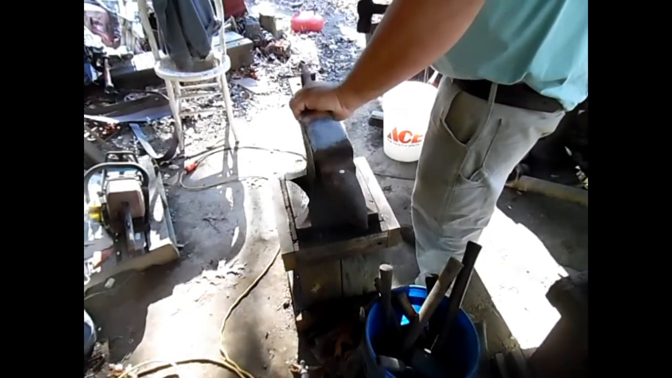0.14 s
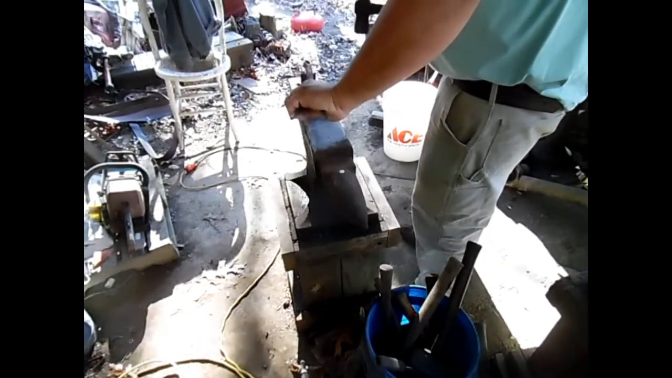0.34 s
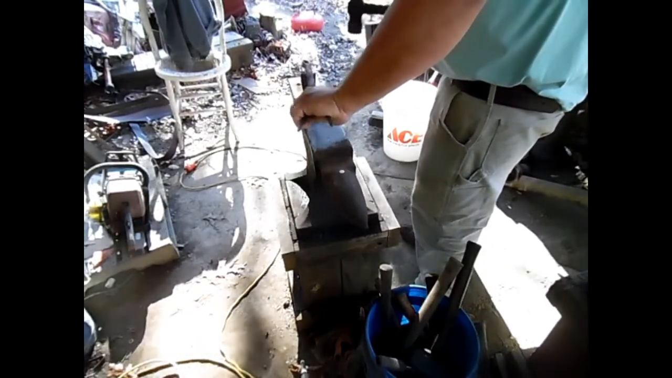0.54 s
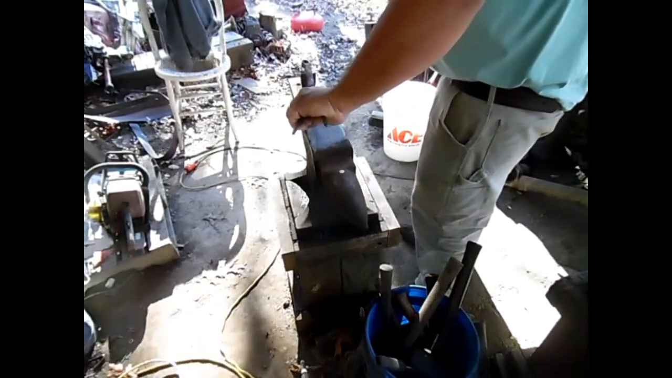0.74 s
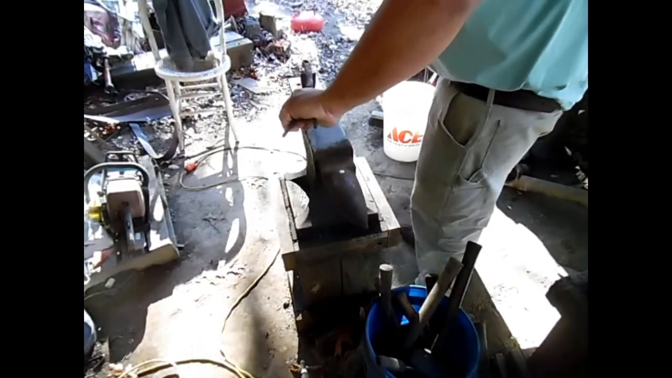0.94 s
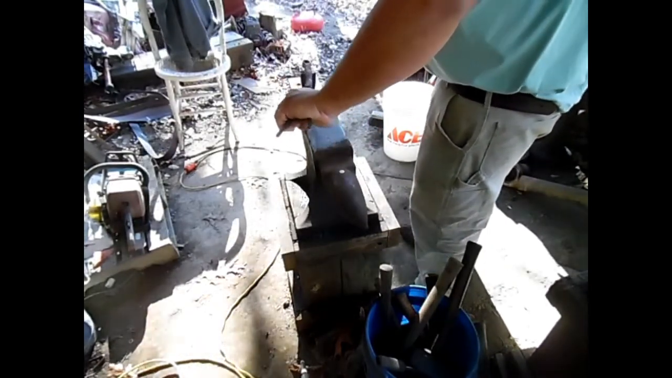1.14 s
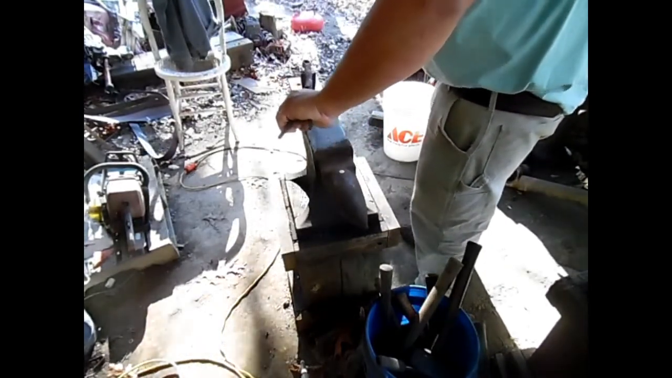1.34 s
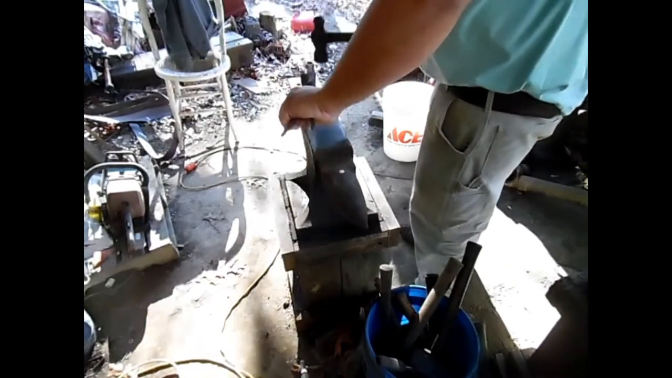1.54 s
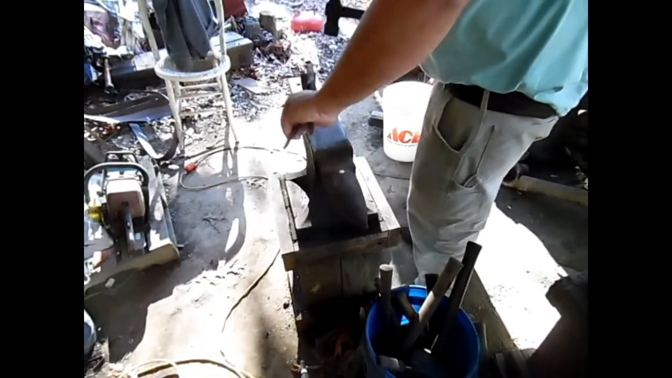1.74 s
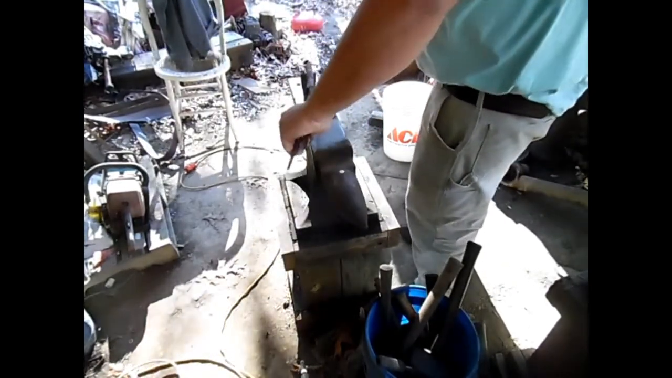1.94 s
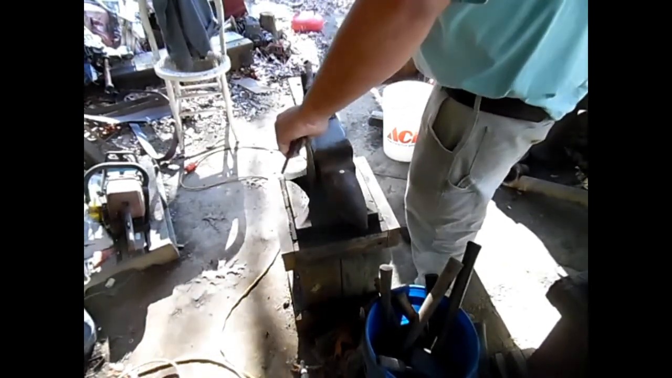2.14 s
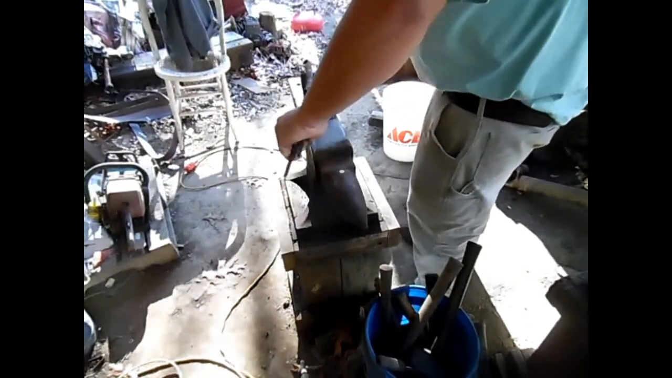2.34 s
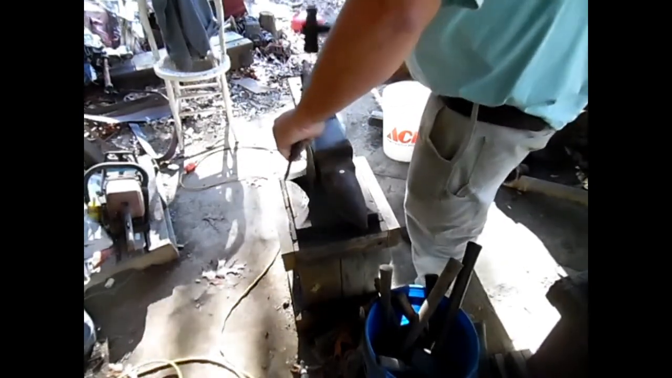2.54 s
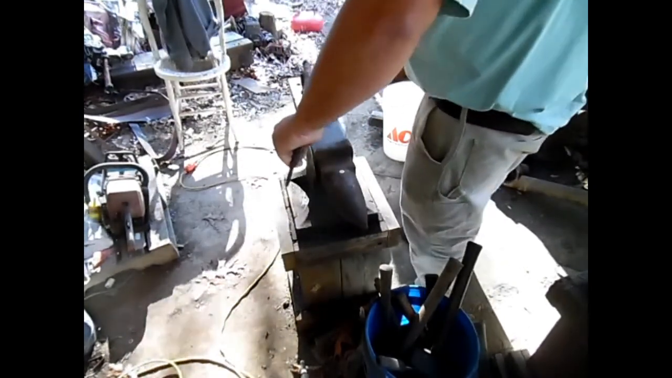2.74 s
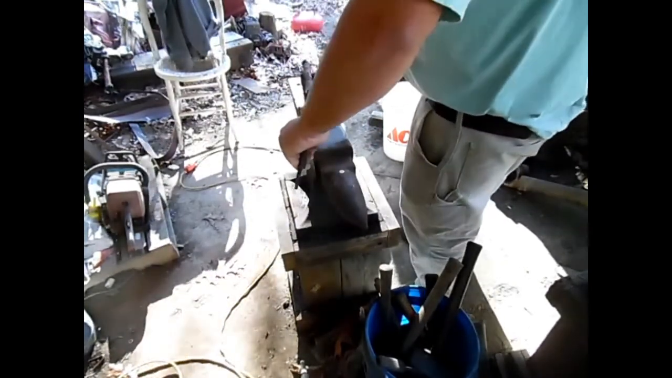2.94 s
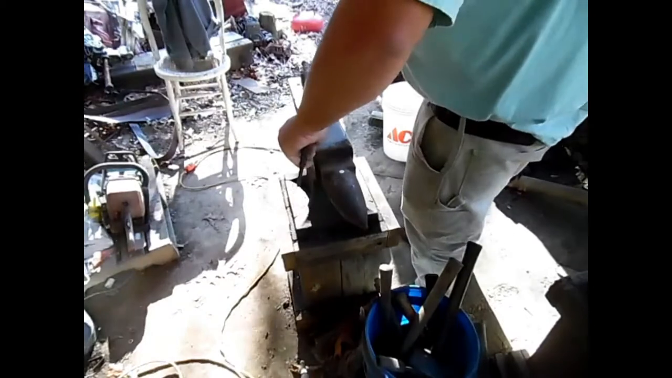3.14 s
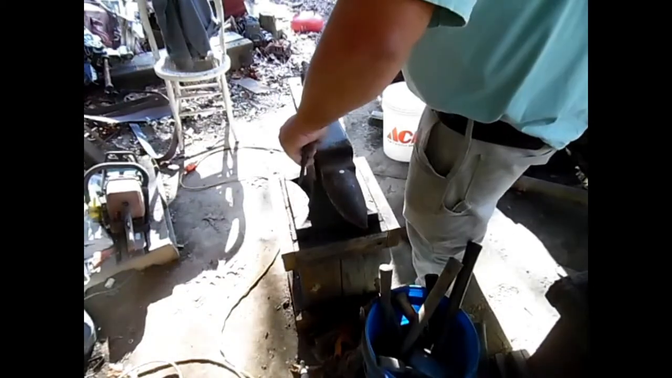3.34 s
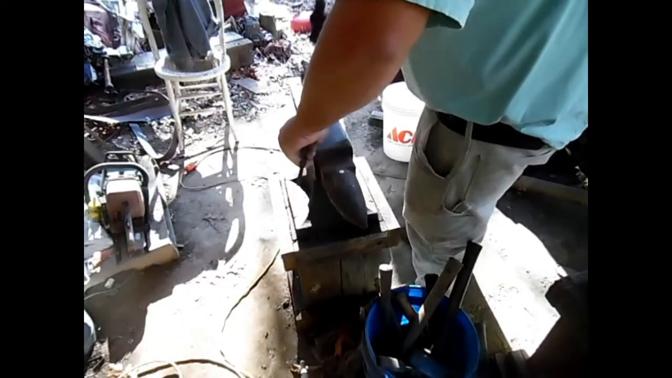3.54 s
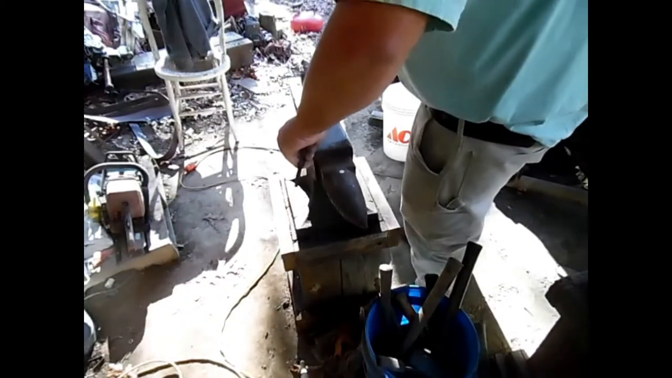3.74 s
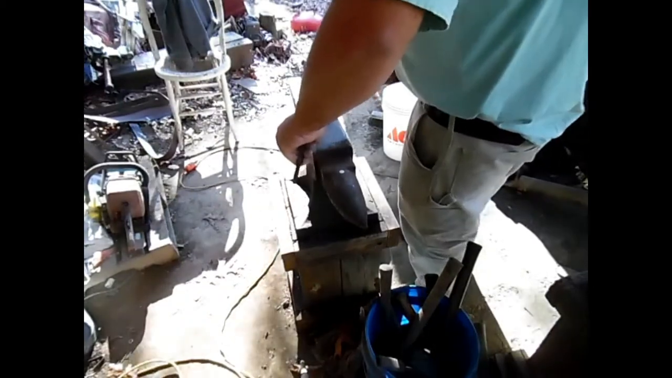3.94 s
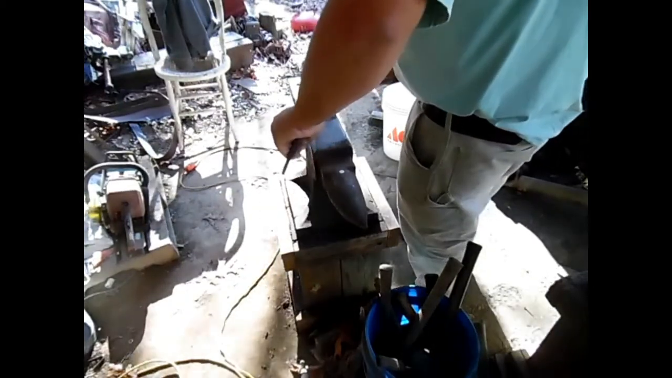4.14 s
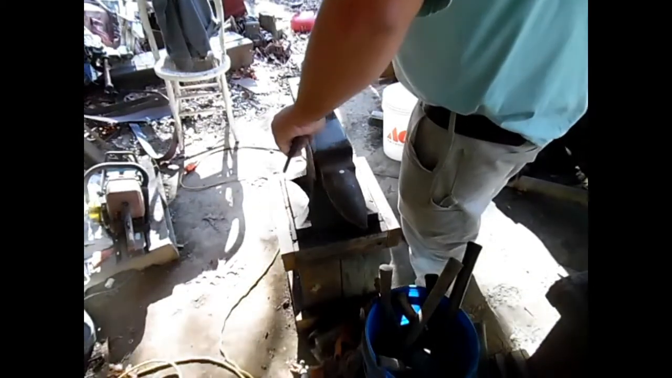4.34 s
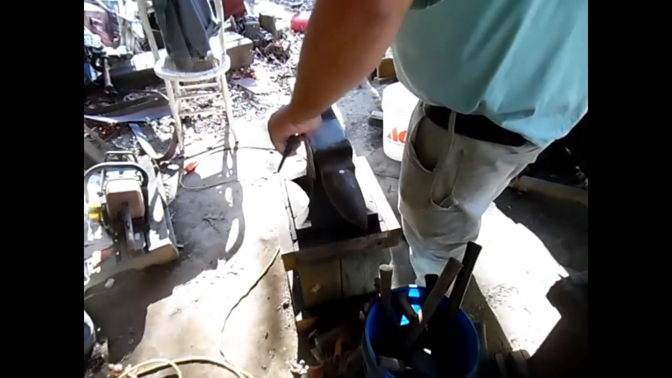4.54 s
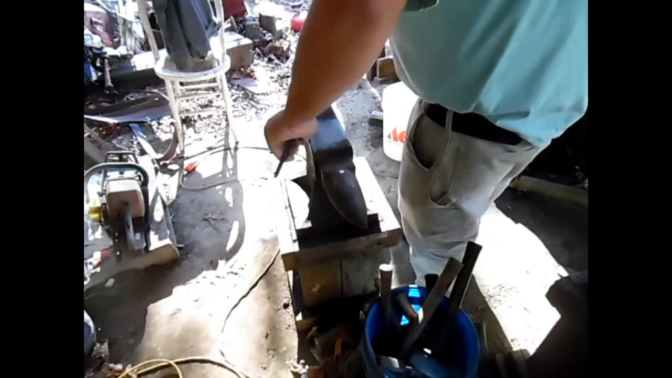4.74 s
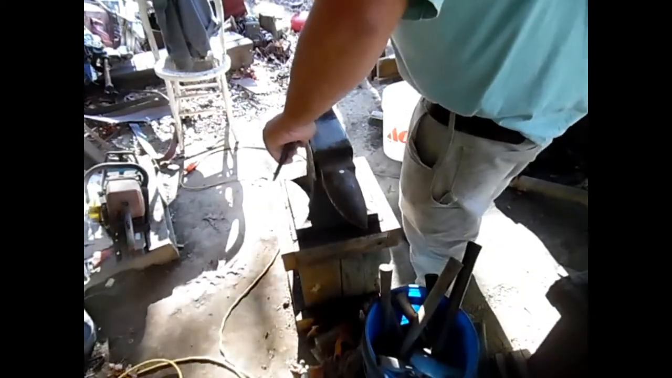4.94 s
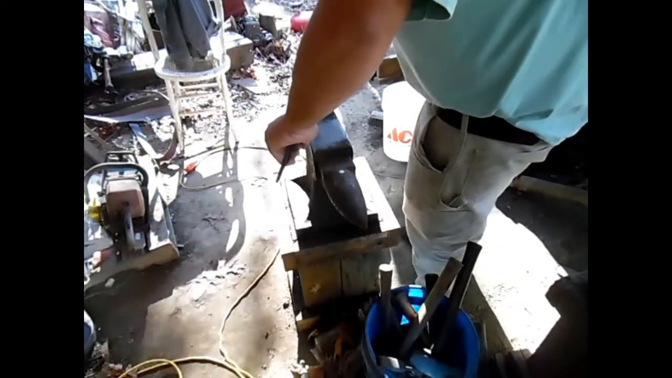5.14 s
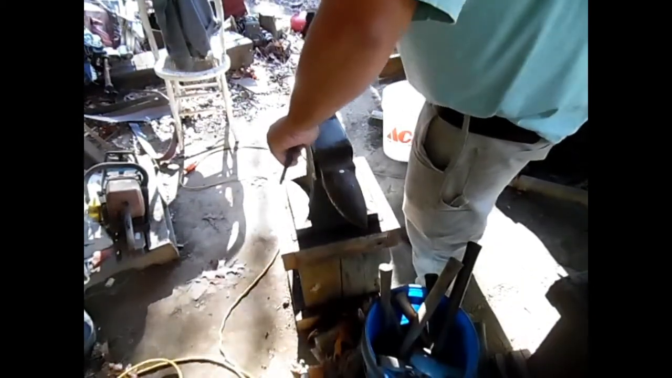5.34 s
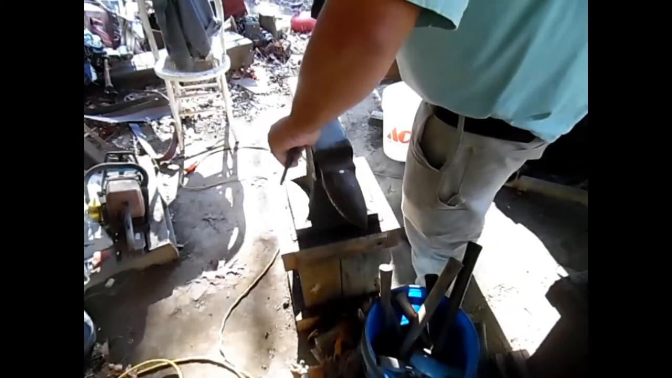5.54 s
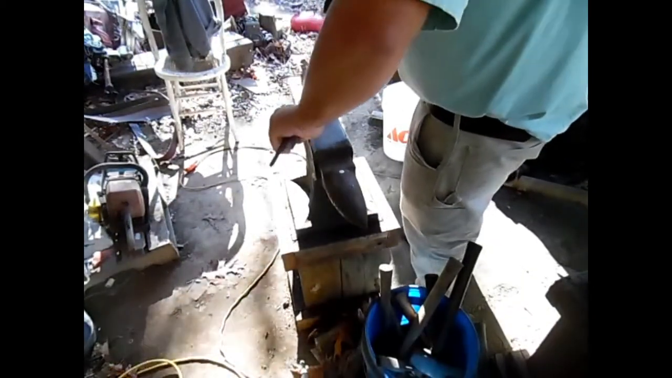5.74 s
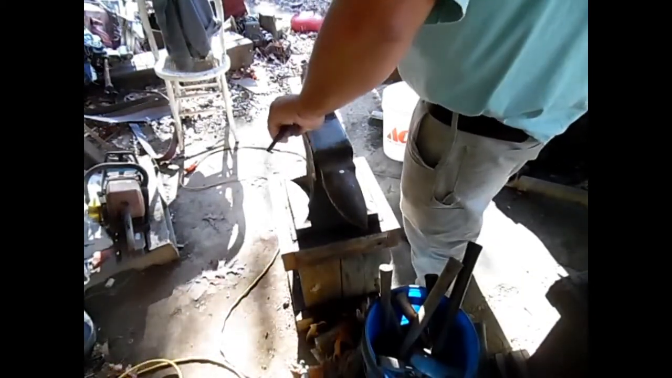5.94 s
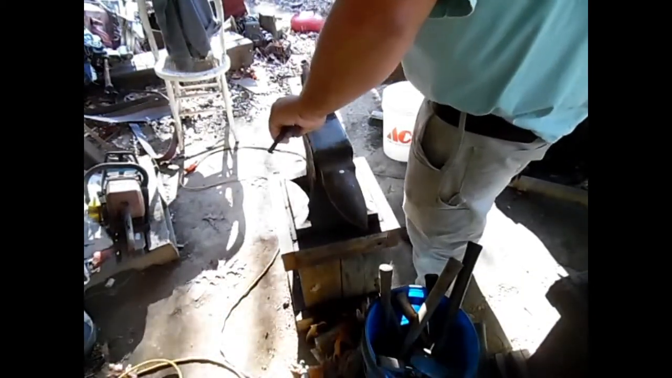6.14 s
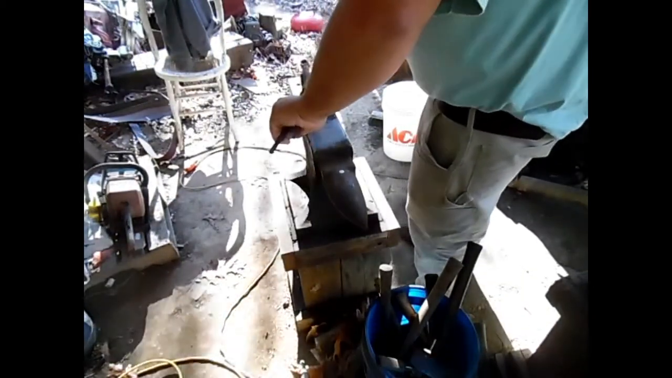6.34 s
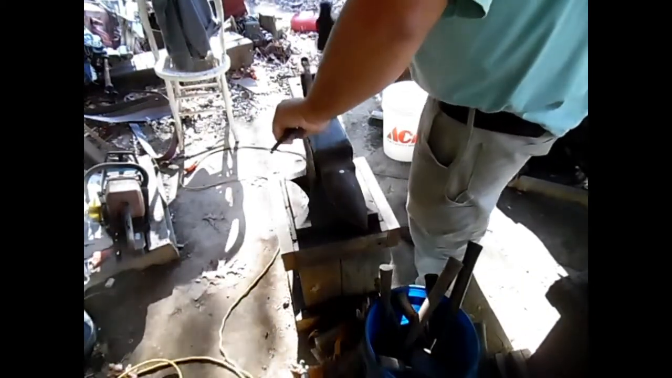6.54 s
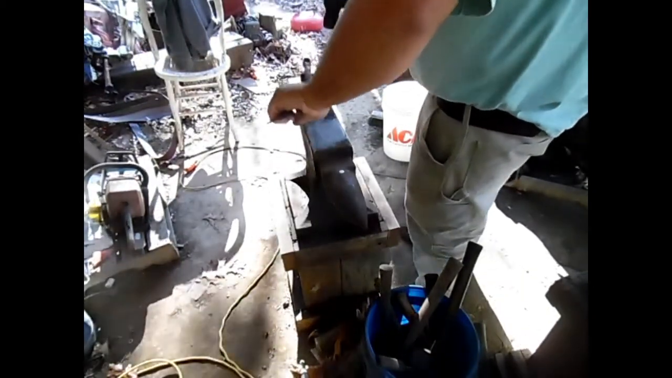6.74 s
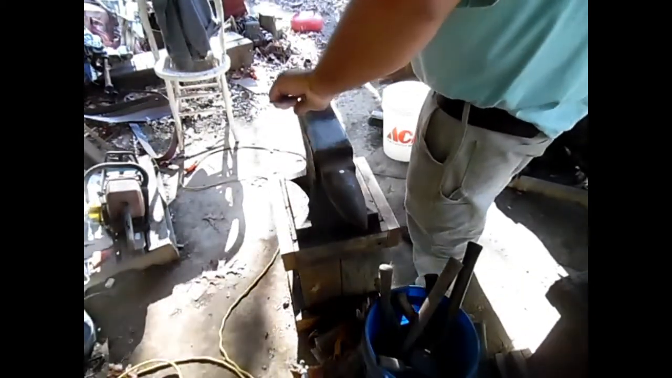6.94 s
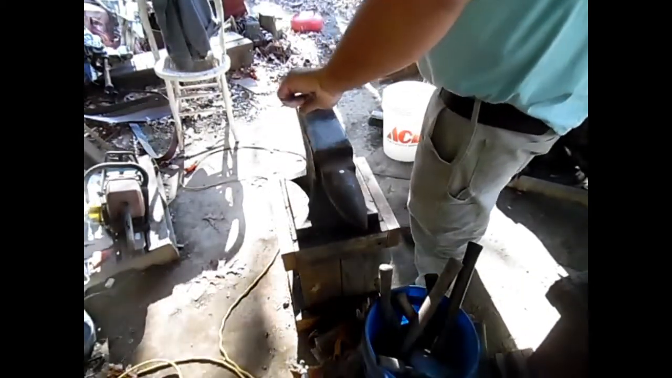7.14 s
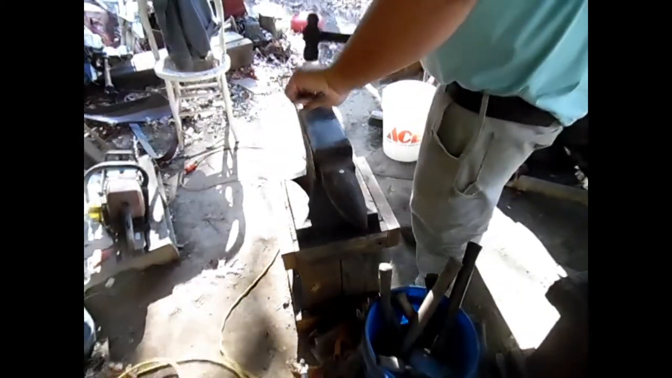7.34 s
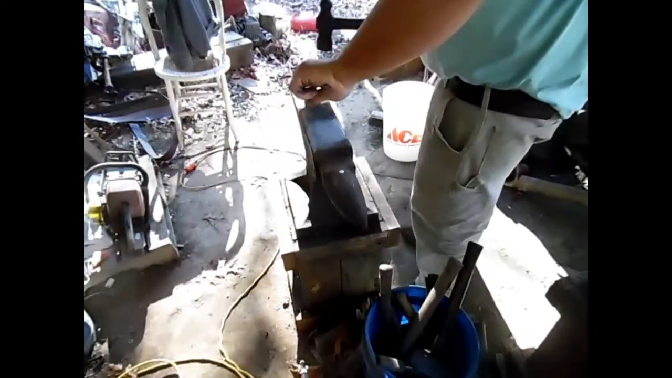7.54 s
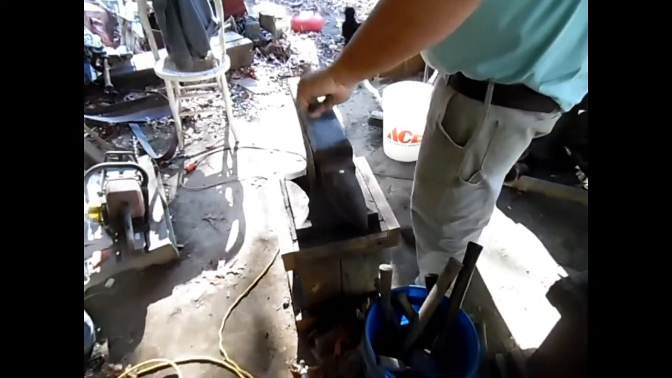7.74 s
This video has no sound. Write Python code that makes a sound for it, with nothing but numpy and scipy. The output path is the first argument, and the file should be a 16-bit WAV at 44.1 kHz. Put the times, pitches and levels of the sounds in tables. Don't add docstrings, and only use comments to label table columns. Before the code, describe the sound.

Six bright hammer blows clang on hot steel over an anvil, overloading a close microphone, with gusty wind buffeting and a faint forge roar between.

```python
import sys
import numpy as np
from scipy import signal
from scipy.fft import rfft, irfft
from scipy.io import wavfile
from scipy.ndimage import uniform_filter1d

SR = 44100
rng = np.random.default_rng(int(sys.argv[2]) if len(sys.argv) > 2 else 0)


def dump_mix(stems):
    frames = np.atleast_2d(stems).T
    limited = np.clip(frames, -1, 1)
    pcm = np.round(limited * 32767).astype(np.int16)
    wavfile.write(sys.argv[1], SR, pcm)


def invert_db(x):
    u = np.asarray(x, float) / 20
    return 10 ** u


N = 344094
T = np.arange(N) / SR

# (start_s, strength_db, crack_db)
BLOWS = [
    (1.5711, 17, -3.5),
    (2.5548, 17, -5),
    (2.806, -17, -8.5),
    (3.5684, 12, -1),
    (5.402, 18.5, -5),
    (6.494, 13.5, -2),
    (7.4291, 11.5, -1.5),
]


def unit(x):
    return x / np.sqrt(np.mean(x ** 2))


def band(x, lo_hz, hi_hz, order=2):
    return signal.sosfilt(signal.butter(order, [lo_hz, min(hi_hz, .45 * SR)], "band", fs=SR, output="sos"), x)


def coloured(points, size):
    points_hz, points_db = np.transpose(points)
    f = np.arange(size // 2 + 1) * SR / size + 1
    shape = invert_db(np.interp(np.log(f), np.log(points_hz), points_db))
    return unit(irfft(rfft(rng.standard_normal(size)) * shape, size))


def walk(rate):
    k = int(SR / rate)
    held = np.repeat(rng.standard_normal(N // k + 1), k)
    return 1.4 * uniform_filter1d(uniform_filter1d(held, k), k)[:N]


def add(out, s, x):
    i = max(int(s * SR), 0)
    out[i:i + len(x)] += x[:N - i]


def impacts(rattle_db):
    # (frequency_hz, level_db per Hz)
    crack_spectrum = [(150, -5.5), (650, -7), (1150, -11.5), (2000, -3.5), (4000, -0.5), (7000, -3.5),
                      (11000, -6.5), (16000, -18.5)]
    # (frequency_hz, level_db per Hz)
    shed_spectrum = [(60, -4.5), (200, 5.5), (750, -2.5), (1150, -5.5), (1700, -5), (4000, -5),
                     (8000, -2.5), (16000, -19.5)]
    crack_t60_s, shed_t60_s = 0.026, 0.15
    out, t = np.zeros(N), T[:SR]
    for s, db, crack_db in BLOWS:
        crack = invert_db(crack_db + 8 - 60 * t / crack_t60_s) * coloured(crack_spectrum, SR)
        shake_db = 0.17 * rattle_db[int(s * SR / 2):][:SR]
        crack += invert_db(crack_db - 6.5 + shake_db - 60 * t / shed_t60_s) * coloured(shed_spectrum, SR)
        crack = band(crack, 44, 9000 * invert_db(db / 2))
        add(out, s, invert_db(db) * crack * np.minimum(t / 0.00022, 1))
    return out


def modes(rattle_db):
    # ([pitch_hz, ..], [(level_db, t60_s), ..])
    foot, horn, waist = ([1399], [(-24, .38)]), ([1459, 1467, 14535], [(-2.5, .155), (-31, .45), (-32, .2)]), ([2893, 2882, 3090], [(-4, .15), (-30, .3), (-40, .3)])
    heel, neck, shoulder = ([3720, 3704, 3801], [(-4, .15), (-42, .4), (-28, .15)]), ([4263, 4278, 4325], [(-8, .19), (-33, .36), (-17, .11)]), ([4512], [(-7, .16)])
    face, rim, ledge = ([5925], [(-12, .125)]), ([5956], [(-24, .36)]), ([6369], [(-22, .33)])
    flat, edge, rib = ([6669, 6686], [(-11, .28), (-36, .35)]), ([5470, 7913, 7926, 9313, 10005, 10925, 10420, 10485], [(-26, .2),
                                      (-19, .24), (-32, .4), (-28, .2), (-38, .35), (-37, .35), (-21, .22),
                                      (-31, .25)]), ([3445], [(-15, .15)])
    # ([pitch_hz, ..], [(level_db, t60_s), ..])
    eye, cheek, peen, tang = ([7111, 7181, 11670, 13360, 15250], [(-26, .55), (-38, .6), (-46, .6),
                              (-49, .5), (-42, .4)]), ([7366, 7424, 8848, 9658, 11860], [(-30, .8), (-30, .45),
                                           (-44, .6), (-39, .6), (-46, .6)]), ([12350, 12458, 12765], [(-42, .4), (-27, .4),
                                                          (-50, .45)]), ([12458], [(-46, 1.3)])
    bar, jaws, reins, stump = ([8947, 10090, 12000, 12630, 13090, 13290, 13700, 14790, 15160, 15400],
                               [(-42, .5), (-38, .55), (-42, .3), (-45, .45), (-41, .4), (-48, .6),
                               (-52, .6), (-48, .4), (-46, .4), (-50, .6)]), ([8662, 8666], [(-34, .5), (-48, 1.3)]), ([5360], [(-33, .85)]), ([62, 85, 330, 480, 760],
                                                                         [(-11, .2), (-16, .15), (-8, .045),
                                                                         (-4, .04), (-5, .04)])
    # (foot_db, horn_db, waist_db, heel_db, neck_db)
    landing = [(-1.5, -5, 1, -1.5, -3), (-9.5, -7.5, 1, -0.5, -1.5), (-12, -9, -4, -30, -31.5),
               (-7, -12, -6.5, -3, -3), (0, -3, -3, -4.5, -5), (-1, -1, -3, -10, -11.5),
               (1, -2, -3, -0.5, 2)]
    # (face_db, rim_db, step_db, table_db, edge_db, rib_db)
    topside = [(0, -0.5, 0, 2, -5, -5), (3, 2, -2.5, 0, -2, -2.5), (-32.5, -32, -35, -32.5, -28, -30.5),
               (0.5, 6, 3.5, -3, -1.5, -10), (-2.5, -5.5, -5, -4.5, -1.5, -14.5),
               (-2, 2, -3, 1, -6.5, -11.5), (0.5, 3.5, -4.5, -4, -0.5, -9)]
    # (eye_db, cheek_db, peen_db, held_bar_db)
    swing = [(8, -5.5, 1, -9.5), (-5.5, 0, 2.5, -6), (-19, -25, -19.5, -18), (1, 2, -14, 9.5),
             (1, -6.5, 3.5, -2), (2, 8.5, -3.5, -5), (-1.5, 6, 3.5, -8)]
    # (shoulder_db, jaws_db, reins_db, tools' t60 [factor], reins' t60 [factor])
    grip = [(-3, -2, 3, 1.1, 1.02), (-3, 0, -4.5, 1, .6), (-32, -16.5, -26, 1.05, .9),
            (-13, 8.5, 2.5, 0.94, .85), (-4, 2, -6, 1.05, .75), (-12, -2, 3.5, 0.87, .9),
            (-4, -4, 0, 1.1, 1.3)]
    damping = [(1.3, 1.2, 1.5, 1.3, 1.3), (1.4, 1.3, 1.2, 1.2, 1.2), (1.6, 1.8, 1.5, 1.7, 2),
               (1.5, 1.8, 1.8, 1.9, 1.4), (1.15, 1.3, 1.7, 1.7, 1.2), (1.3, 1.3, 2, 1.5, 1.4),
               (1.6, 1.8, 1.9, 1.8, 1.35)]
    # (after_s, extra_fade_db per s, table t60, peen t60 [factors])
    choke = [(.08, 170.5, 1.2, 1.1), (0.087, 120, 1.2, 1), (0.11, 49.5, 2, 1.05), (0.034, 79.5, 1.05, 1.05),
             (0.123, 79, 1.2, 1.35), (.06, 109, 1.2, 1.3), (.11, 149, 1.7, 1.2)]
    after = [-27.5, -29.5, -35, -31.5, -29, -31.5, -33]
    tang_share = [0.5, 4.5, -19, -13.5, 0.5, -4, 3]

    after_t60, after_split_hz = 1.9, 5.1
    load, load_s = 0.0025, 0.03
    anvil = [foot, horn, waist, heel, neck, face, rim, ledge, flat, edge, rib, shoulder]
    tools = [eye, cheek, peen, bar, jaws, reins, stump, tang]
    loose = [1] * len(anvil) + [0.38] * len(tools)
    out = np.zeros(N)
    for i, (s, db, crack_db) in enumerate(BLOWS):
        horn_k, waist_k, heel_k, neck_k, top_k = damping[i]
        shoulder_db, jaws_db, reins_db, held_k, reins_k = grip[i]
        choke_s, choke_db, flat_k, peen_k = choke[i]
        stretch = [horn_k, horn_k, waist_k, heel_k, neck_k, top_k, top_k, top_k, flat_k, top_k, heel_k, neck_k]
        stretch += [held_k, held_k, peen_k, held_k, held_k, reins_k, held_k, held_k]
        shares_db = [*landing[i], *topside[i], shoulder_db]
        shares_db += [*swing[i], jaws_db, reins_db, crack_db, tang_share[i]]
        chance = {}
        for (pitches, rings), share_db, k, shaken in zip(anvil + tools, shares_db, stretch, loose):
            drawn = dict(zip(pitches, rng.standard_normal((len(rings), 2))))
            chance = {**drawn, **chance}
            for hz, (mode_db, t60) in zip(pitches, rings):
                size, turn = chance[hz]
                u = T[:int(min(k * t60 * 2, 1.5) * SR)]
                shake_db = shaken * rattle_db[int(turn % 1 * N / 2):][:len(u)] * np.minimum(u / 0.14, 1)
                level_db = db + mode_db + share_db + 0.48 * size
                fade = invert_db(shake_db + level_db - 60 * u / (k * t60)) * (1 - np.exp(-u / 0.0017))
                lag_s = shaken * load * load_s * (1 - np.exp(-u / load_s))
                cycles = hz * (1 + 0.00029 * size) * (u - lag_s) + turn
                ring = np.sin(2 * np.pi * cycles + 0.15 * np.roll(shake_db, 500))
                if shaken == 1:
                    ring *= invert_db(-choke_db * (hz < 5000) * np.maximum(u - choke_s, 0))
                    linger = invert_db(after[i] + 60 * (1 - 1 / after_t60) * u / (k * t60))
                    ring += linger * np.sin(2 * np.pi * (hz + after_split_hz * turn) * u)
                add(out, s, fade * ring)
    return out


def clutter():
    out, u = np.zeros(N), T[:SR // 4]
    for (s, db, crack_db), rows in zip(BLOWS, rng.random((len(BLOWS), 28, 4))):
        for k, (place, size, length, turn) in enumerate(rows):
            octave = (k + place) / 11
            level_db = db + crack_db - 25.5 - 2 * octave - 12 * size
            fade = invert_db(level_db - 60 * u / (0.13 * (1 + length)))
            add(out, s, fade * np.sin(2 * np.pi * (1700 * 2 ** octave * u + turn)))
    return out


def hammer():
    rattle_db = 3 * walk(38)
    return impacts(rattle_db) + modes(rattle_db) + clutter()


def eddies(per_s, lo_hz, hi_hz, scatter_db):
    kicks = (rng.random(N) < per_s / SR) * rng.standard_normal(N) * invert_db(scatter_db * rng.exponential(size=N))
    smooth = signal.butter(4, 1.9 * hi_hz, fs=SR, output="sos")
    bumps = signal.sosfilt(smooth, band(kicks, lo_hz, hi_hz))
    return bumps / np.sqrt(uniform_filter1d(bumps ** 2, SR // 8) + 1e-9)


def wind():
    # (start_s, slow_level_db, sharpness_db = middle eddies re slow)
    breeze = [(0, -36, -35), (.4, -37.5, -36), (.8, -30.5, -3.5), (1.56, -26.5, -7.5), (1.95, -13, -20.5),
              (2.35, -28.5, -10), (2.72, -17, -19.5), (2.95, -21.5, -5.5), (3.399, -25.5, -19.5),
              (3.781, -15, -11.5), (4.38, -26, -34), (5.05, -23, -8.5), (5.55, -12, -7), (5.78, -13, -13),
              (6.252, -19.5, -5), (6.65, -11, -4), (6.97, -16.5, -2), (7.8, -21, -17.5)]
    # (peak_s, peak_db, half_length_s, sharpness_db)
    gusts = [(0.55, -25.5, 0.094, -2.5), (0.867, -13.5, 0.024, -1.5), (0.927, -13, 0.014, -2),
             (1.028, -10.5, 0.047, -32), (1.16, -14, 0.019, 8), (1.262, -22, 0.045, 1.5),
             (1.356, -11.5, 0.035, -3.5), (1.45, -15, 0.033, -3), (1.829, -30.5, 0.014, -15),
             (2.148, -12.5, 0.07, -14.5), (2.535, -31.5, 0.074, -1.5), (3.074, -4.5, 0.077, -24),
             (3.266, -14, 0.098, -15), (3.535, -14, 0.049, -1.5), (3.659, -10, 0.012, -3),
             (3.904, -7.5, 0.081, -10.5), (4.086, -4, 0.019, -8.5), (4.252, -4, 0.07, -11.5),
             (4.421, -18, 0.019, 7), (4.489, -4.5, 0.017, -4), (4.606, -11.5, 0.2, -13),
             (4.964, -13.5, 0.063, -10), (5.2, -25, 0.072, -16), (5.288, -16.5, 0.021, 1),
             (5.863, -10, 0.074, -9), (6.128, -8, 0.063, -8), (6.372, -20.5, 0.059, 7),
             (6.833, -15, 0.037, 1.5), (7.12, -9, 0.058, -12), (7.383, -14.5, 0.078, -3)]
    s, db, sharp_db = np.transpose(breeze)
    parts = [(invert_db(np.interp(T, s, db)), np.interp(T, s, sharp_db))]
    parts += [(invert_db(db) * np.exp(-((T - s) / half_s) ** 2), sharp_db) for s, db, half_s, sharp_db in gusts]
    slow = sum(size for size, _ in parts)
    middle = sum(size * invert_db(sharp_db - 2) for size, sharp_db in parts)
    small = sum(size * invert_db(-25 + 0.86 * sharp_db) for size, sharp_db in parts)
    out = slow * eddies(230, 0.76, 69, 0.99)
    out += middle * eddies(280, 88, 270, 1.7)
    return out + small * eddies(500, 310, 630, 3.5)


def buffets():
    # (peak_s, peak_db, centre_hz)
    pops = [(0.85, -2, 180), (0.901, -3, 107), (1.064, -11.5, 110), (1.154, -1, 221), (1.236, -14, 133),
            (1.267, -24, 188), (1.428, -3, 108), (1.456, -9.5, 152), (2.143, -16, 110.4),
            (3.496, -11, 102.8), (3.656, -33, 129), (4.069, -25, 223), (4.246, -14, 110), (4.41, -26, 104),
            (4.482, -40, 199), (4.704, -14.5, 158), (4.916, -7, 91), (5.158, -9, 120), (5.286, -29, 105),
            (5.545, -27.5, 157), (6.145, -16.5, 187), (6.313, -10.5, 270), (6.385, -7, 186),
            (6.819, -21.5, 270), (7.121, -40.5, 124), (7.156, -16.5, 223), (7.335, -16.5, 184)]
    # (peak_s, peak_db, spike_width_ms)
    rips = [(1.239, -21.5, 0.52), (1.269, -24.5, 0.62), (1.332, -25, 0.68), (3.521, -27.5, 0.58),
            (3.655, -31.5, 0.81), (3.913, -44, 0.57), (4.071, -30, 0.66), (4.093, -32, 0.65),
            (4.193, -30.5, 0.93), (4.245, -39, 0.55), (4.282, -39.5, 0.67), (4.414, -16, 0.67),
            (4.437, -41.5, 0.52), (4.472, -41, 0.44), (4.487, -21, 0.61), (4.496, -23.5, 0.7),
            (4.535, -33, 0.98), (4.547, -31, 0.75), (4.581, -25, 0.94), (4.754, -31.5, 0.7),
            (4.814, -32.5, 0.44), (4.928, -42, 0.92), (5.166, -40, 0.44), (5.265, -34, 0.53),
            (5.29, -12, 0.68), (5.298, -15, 1), (5.546, -34.5, 0.56), (5.695, -45, 0.51),
            (5.792, -38, 0.73), (5.845, -39.5, 0.52), (5.886, -37.5, 0.54), (6.077, -30.5, 0.83),
            (6.119, -35.5, 0.66), (6.141, -28.5, 0.58), (6.168, -31, 0.4), (6.229, -29.5, 0.67),
            (6.299, -25, 0.79), (6.314, -16.5, 0.64), (6.34, -28.5, 0.43), (6.381, -27, 0.55),
            (6.399, -23, 0.5), (6.414, -19, 0.56), (6.466, -19.5, 0.77), (6.554, -21.5, 0.51),
            (6.579, -29, 0.44), (6.732, -34.5, 0.59), (6.753, -30, 0.81), (6.806, -35, 0.5),
            (6.814, -31, 0.41), (6.821, -26, 0.6), (6.834, -37, 0.5), (6.85, -39, 0.28),
            (6.876, -37.5, 0.53), (7.122, -28.5, 0.6), (7.151, -26, 0.57), (7.16, -26, 0.56),
            (7.173, -24.5, 0.71), (7.341, -23, 0.61), (7.4, -25, 0.57), (7.505, -37, 0.47)]
    out = np.zeros(N)
    for (s, db, hz), side in zip(pops, rng.choice([-1, 1], len(pops))):
        u = (T[:2000] - .02) * np.pi * hz
        add(out, s - .013, side * invert_db(db - 3) * (1 - 2 * u ** 2) * np.exp(-u ** 2))
    t = T[:1500]
    swell = t / 0.0018 * np.exp(1 - t / 0.0036)
    for (s, db, width_ms), noise in zip(rips, rng.standard_normal((len(rips), 1500))):
        spike = band(1 / (1 + ((t - .0045) * 1000 / (0.7 * width_ms)) ** 2), 130, 3000, order=1)
        tear = swell * band(noise, 130 / width_ms, 429 / width_ms, order=4)
        rip = band(unit(spike) + invert_db(-3.5) * unit(tear), 60, 1250 / width_ms, order=3)
        add(out, s - .0025, invert_db(db - 11.5) * rip)
    return out


def whistles():
    # (start_s, end_s, start_hz, end_hz)
    glides = [(5.222, 5.305, 7480, 7820), (6.235, 6.49, 2500, 2090), (6.35, 6.494, 2800, 2470),
              (6.365, 6.46, 4200, 3930), (6.325, 6.385, 3860, 3740), (6.43, 6.49, 4130, 4320),
              (6.415, 6.465, 4460, 4300), (6.295, 6.34, 3600, 3380), (6.21, 6.29, 1030, 980),
              (7.295, 7.355, 800, 960), (7.32, 7.415, 1780, 2080), (7.34, 7.39, 3470, 3300)]
    glide_db = [-51, -42, -43, -46, -48, -48, -50, -49, -41, -34, -40, -46]
    out, waver, flicker_db = np.zeros(N), 0.003 * walk(40), 2 * walk(36)
    starts = rng.integers(0, N // 2, len(glides))
    for (t0, t1, hz0, hz1), db, start in zip(glides, glide_db, starts):
        u = np.linspace(0, 1, int((t1 - t0) * SR))
        hz = (hz0 + (hz1 - hz0) * u) * (1 + waver[start:][:len(u)])
        swell = invert_db(db - 4.5 + flicker_db[start:][:len(u)]) * np.sin(np.pi * u) ** 0.67
        add(out, t0, swell * np.sin(2 * np.pi * np.cumsum(hz) / SR))
    return out


def forge():
    # (frequency_hz, level_db per Hz)
    roar_spectrum = [(59, -34), (100, -3), (166, -0.5), (189, 1), (265, -2.5), (1050, -9.5), (1140, -13),
                     (1820, -15), (2500, -19), (10100, -29.5), (15800, -40.5)]
    roar = invert_db(-36 + 0.97 * walk(27)) * band(coloured(roar_spectrum, N), 140, 18000)
    hum_hz = 156.4 + 0.89 * walk(8)
    return roar + invert_db(-38.5 + 0.92 * walk(3.9)) * np.sin(2 * np.pi * np.cumsum(hum_hz) / SR)


def small_things():
    # (start_s, peak_db,
    # centre_hz)
    ticks = [(.69, -48, 9000), (1.135, -44, 9200), (2.368, -44, 8000), (4.943, -38, 7500),
             (4.952, -47, 10000), (4.988, -34, 7500), (5.155, -43, 6500), (5.526, -26, 2600),
             (7.516, -26, 2600), (7.53, -29, 4470), (7.55, -45, 2210)]
    out, t = np.zeros(N), T[:900]
    for s, db, hz in ticks:
        tick = unit(band(rng.standard_normal(900), 0.65 * hz, 1.45 * hz))
        add(out, s, invert_db(db - 60 * t / 0.05) * tick)
    throb = np.maximum(np.sin(2 * np.pi * np.cumsum(12 + .7 * walk(2)) / SR), 0) ** 6
    buzz = unit(band(rng.standard_normal(N), 10100, 10800))
    return out + invert_db(-58.5 + 3 * walk(3.4)) * throb * buzz


def gain_db():
    # (wait_s, deepest_db, turns_after_s, settles_db, recovery_s)
    ducks = [
        (0.016, -27, 0.44, -15, 0.17),
        (0.021, -29.5, .465, -9, 0.2),
        (0.0073, -21, 0.48, -9, 0.41),
        (0.018, -26, 0.45, 1, 0.55),
        (0.0028, -27, 0.564, -13.5, 0.1),
        (0.015, -29.5, 0.29, -36, 0.11),
    ]
    # (centre_s, jump_db)
    steps = [
        (0.899, -6),
        (1.15, -3.5),
        (2.355, 8),
        (4.799, 1.5),
        (5.141, 3),
        (7.12, 2),
    ]
    ducked_db = -22.5

    def jump(t, s, db):
        return db * (1 + np.tanh((t - s) / 0.045)) / 2

    gain = np.full(N, 2.5)
    for s, db in steps[:2]:
        gain += jump(T, s, db)
    hits = [s for s, db, _ in BLOWS if db > 0]
    for hit, (wait_s, deep_db, turn_s, settle_db, back_s) in zip(hits, ducks):
        i = int(hit * SR)
        u = T[i:] - hit
        drop = (gain[i] - ducked_db) * np.exp(-np.maximum(u - wait_s, 0) / 0.044)
        sink = np.interp(u, [0.19, turn_s], [ducked_db, deep_db])
        rise = (settle_db - deep_db) * (1 - np.exp(-np.maximum(u - turn_s, 0) / back_s))
        gain[i:] = drop + sink + rise + sum(jump(T[i:], s, db) for s, db in steps if s > hit)
    return gain


def scene():
    mono = hammer() + wind() + buffets() * invert_db(-gain_db()) + whistles() + forge() + small_things()
    return np.array([mono, mono])


def low_pass(x):
    return signal.sosfilt(signal.butter(12, 15920, fs=SR, output="sos"), x)


def record(dry):
    clipped = np.clip(dry * invert_db(gain_db()), -.88, .88) + invert_db(-76) * rng.standard_normal(N)
    strain = uniform_filter1d(np.abs(band(clipped[0], 5000, 16000)), 200)
    apart = invert_db(-17) * np.maximum(strain - .02, 0) * unit(band(rng.standard_normal(N), 9500, 15500))
    cut = signal.sosfilt(signal.ellip(8, .2, 55, 15700, fs=SR, output="sos"), clipped)
    mix = np.clip(cut, -.95, .95) + apart * np.array([[1], [-1]])
    return low_pass(mix)


dry = scene()
out = record(dry)
dump_mix(out)
```